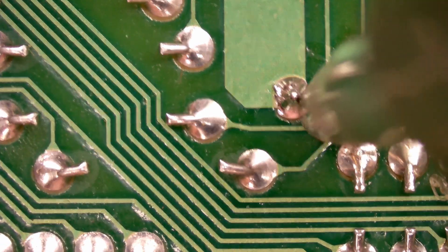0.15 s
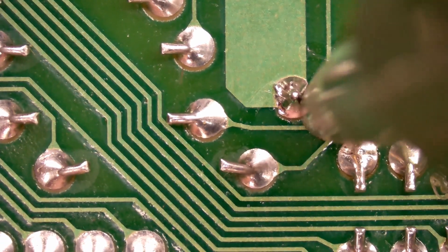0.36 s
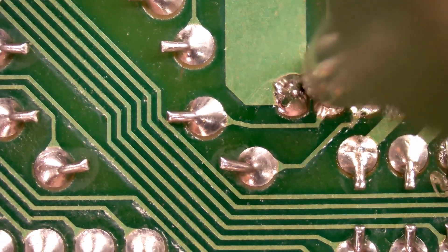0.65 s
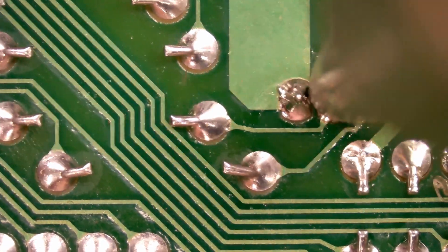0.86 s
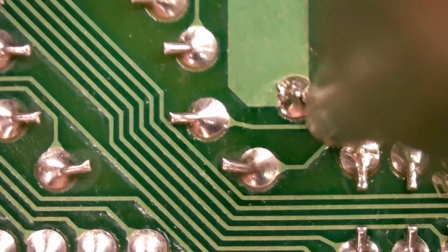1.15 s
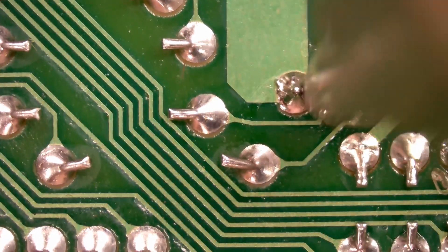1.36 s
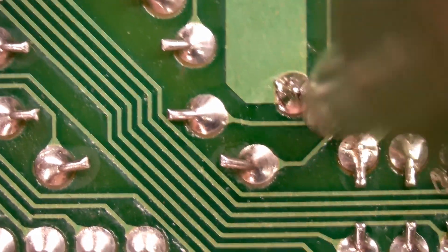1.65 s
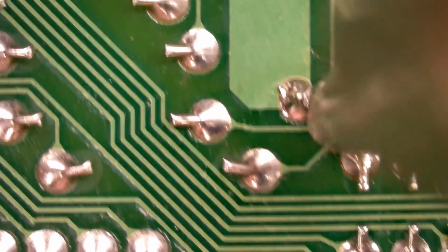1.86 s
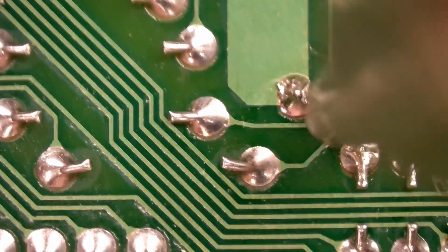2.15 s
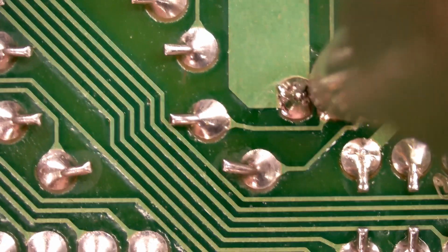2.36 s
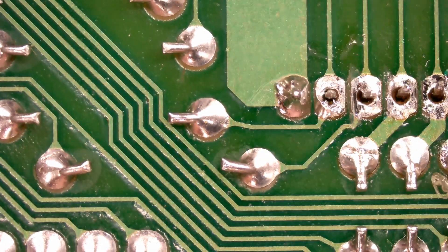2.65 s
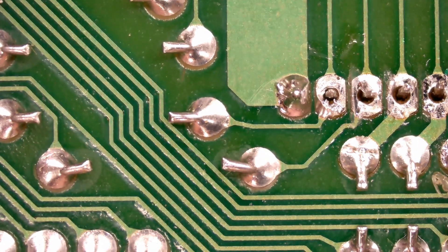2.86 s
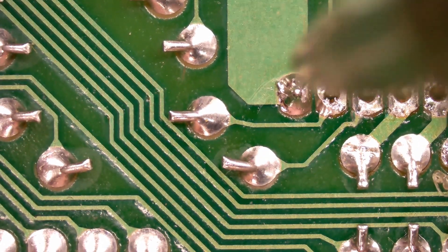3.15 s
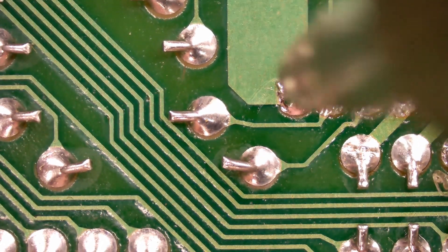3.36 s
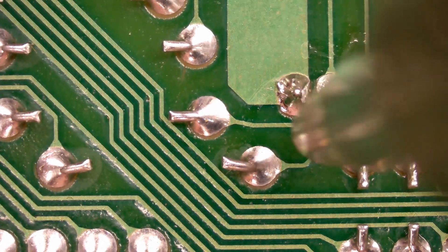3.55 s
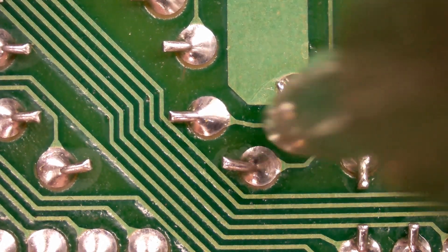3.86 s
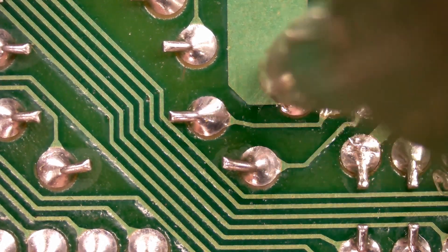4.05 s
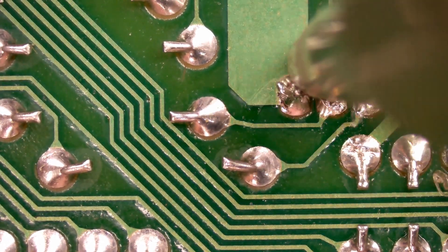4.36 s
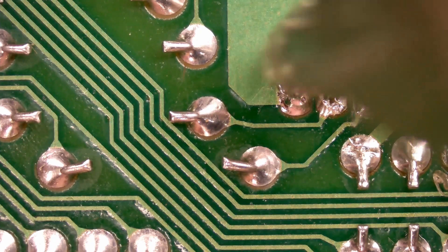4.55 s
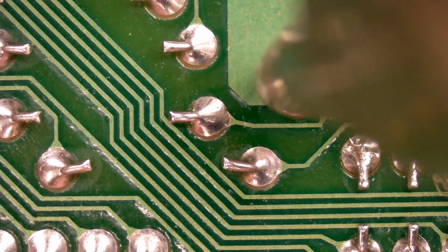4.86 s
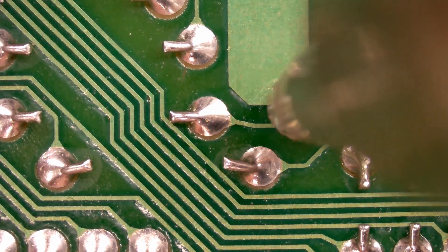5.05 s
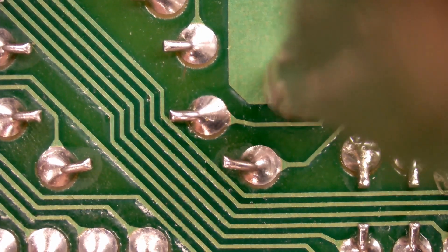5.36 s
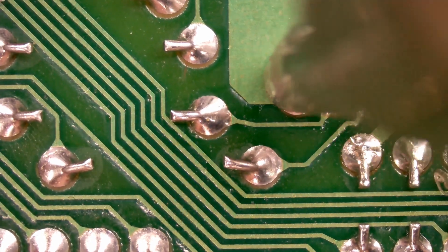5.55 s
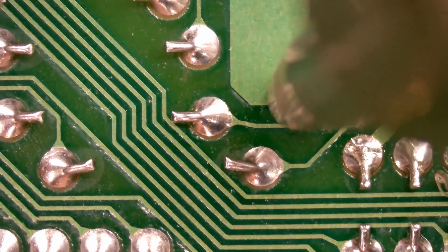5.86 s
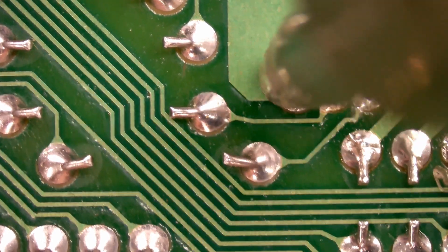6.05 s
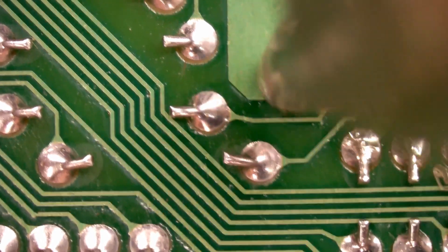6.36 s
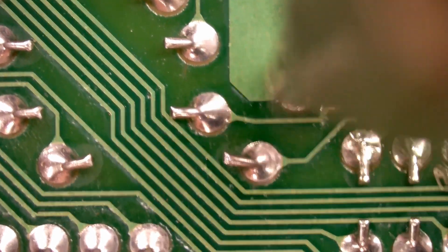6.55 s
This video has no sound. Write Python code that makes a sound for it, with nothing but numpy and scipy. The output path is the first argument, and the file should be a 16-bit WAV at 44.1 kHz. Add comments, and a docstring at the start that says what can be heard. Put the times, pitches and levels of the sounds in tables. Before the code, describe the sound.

Buzzing pump hum and thin suction hiss from a desoldering gun, with small metallic scrapes and a sharp spit of solder.

```python
"""Desoldering gun on a circuit board.

A diaphragm pump hums on the bench at about 50 strokes a second; air hisses into the hot nozzle.
Twice a solder joint seals it: the hiss dies, vacuum builds, the pump knocks and speeds up.
The seal breaks with a spit or a rush of air. The nozzle scrapes as it is rocked around the pins."""
import sys
import numpy as np
from scipy import signal
from scipy.fft import rfft, irfft, next_fast_len
from scipy.io import wavfile

SR = 44100
rng = np.random.default_rng(int(sys.argv[2]) if len(sys.argv) > 2 else 0)


def to_wav(s):
    """Save 16-bit WAV."""
    ch = np.atleast_2d(s).T  # columns
    pcm = np.round(np.clip(ch, -1, 1) * 32767)  # PCM
    wavfile.write(sys.argv[1], SR, pcm.astype(np.int16))


N = 295138

# Noise spectra: freq_hz, relative_db
ROOM_SPECTRUM = [(25, -15), (45, 6), (80, 5.5), (130, 8.5), (230, -0.5), (420, 5.5), (700, 1.5),
                 (1200, -6.5), (2200, -5), (5000, -18.5), (15800, -16)]
EXHAUST_SPECTRUM = [(700, 1), (1100, 5.5), (1700, 0.5), (2200, 1.5), (2600, -3), (3400, -0.5), (4700, -4.5),
                    (6100, -1.5), (7000, 1.5), (7800, 2), (8600, 3), (9500, -16.5), (11000, -17),
                    (15800, -16)]
HISS_SPECTRUM = [(9000, -38), (11500, -25), (12500, -16), (13300, -5), (14000, -4.5), (15000, -3),
                 (15800, 1)]
RUSH_SPECTRUM = [(1500, -14), (3000, -3.5), (4700, -5.5), (6200, -0.5), (7500, 4.5), (8600, 3.5),
                 (9600, 4.5), (10700, -3.5), (11600, 0.5), (15800, -14)]
# Resonances: freq_hz, width_hz, relative_db
OUTLET_MODES = [(5750, 1000, -1), (7500, 61, 0), (7460, 83, -1.1)]
BOARD_MODES = [(1153, 310, 1.5), (1610, 580, -2), (1900, 650, -5)]
PIN_MODES = [(2130, 250, 0), (3140, 1180, 8.5), (3585, 1300, 2), (4330, 570, -1)]
NOZZLE_MODES = [(5050, 160, -7), (6700, 1060, -5.5), (6830, 550, 5.5), (9400, 1400, 2), (9800, 1600, 0.5),
                (13600, 1900, -8.5)]
# Solder sealing the nozzle: seal_s, open_s, closing_s, opening_s
SEAL_TIMES = [(0.75, 1.53, 0.015, 0.0041), (3.381, 4.45, 0.11, .02)]
# Motor sags under part load, races with little air left: vacuum, stroke_hz
MOTOR_CURVE = [(0, 49.62), (.3, 48.85), (.53, 49.6), (.93, 52.6)]
# Pump hum: harmonic, open_db, heavy_load_db, full_vacuum_db
HUM_HARMONICS = [(1,-75,-73,-68.5), (2,-63.5,-68,-71.5), (3,-59.5,-61.5,-66.5), (4,-73,-68.5,-72.5),
                 (5,-87,-74.5,-72), (6,-71.5,-76.5,-76), (7,-62,-58.5,-70.5), (8,-60.5,-55,-70.5),
                 (9,-58,-57.5,-65), (10,-71.5,-71,-89), (11,-60.5,-66,-72), (12,-73.5,-65,-66.5),
                 (13,-67,-70,-64), (14,-78,-75.5,-73), (15,-83.5,-68,-108), (16,-73.5,-80,-71),
                 (17,-73.5,-66.5,-67.5), (18,-67.5,-81,-77), (19,-82,-64.5,-66), (20,-66.5,-63,-70.5),
                 (21,-67,-70,-62), (22,-74.5,-71,-94)]
# Hum dips and swells: harmonic, centre_vacuum, half_width_vacuum, gain_db
HUM_SWINGS = [(3,.4,.3,7), (7,.3,.12,-16), (7,.85,.04,-13), (8,.22,.1,4.5), (8,.4,.08,-9), (9,.14,.07,-4),
              (9,.53,.06,-10), (10,.14,.1,7), (10,.48,.08,6), (11,.42,.09,-8), (12,.23,.05,-8),
              (12,.52,.04,-12), (13,.24,.1,-11)]
# Hum phase lead at the left ear: freq_hz, lead_rad
HUM_LEFT_LEAD = [(50, -.5), (150, .1), (345, 0.75), (400, 1.25), (470, 0.97), (540, 1.46), (595, 2.5),
                 (690, -0.1), (800, 1.26), (930, 2), (1100, 2.38)]
# Casing response per harmonic: freq_hz, open_db, sealed_db
CASING_RESPONSE = [(1290,-118,-85), (1336,-76,-97), (1350,-82,-72), (1316,-76.5,-78), (1440,-79.5,-68.5),
                   (1480,-93.5,-97), (1682,-71,-70.5), (1607,-68.5,-68), (1733,-73,-82.5), (1870,-89,-67.5),
                   (1900,-114,-102), (2490,-77.5,-108), (2430,-74,-81), (2552,-90.5,-76.5),
                   (2660,-89,-85.5)]
# Nozzle on pin and pad: peak_s, swell_s, board_db, pin_db, nozzle_db
SCRAPE_EVENTS = [(0.12, 0.0076, -70, -62, -74), (0.23, 0.012, -69, -63, -67),
                 (0.447, 0.0043, -58, -56, -71), (0.62, 0.0067, -70, -60, -51),
                 (1.155, 0.005, -66, -73, -72), (1.261, 0.0026, -55, -80, -80),
                 (1.859, 0.0082, -65.5, -63.5, -67), (1.994, 0.0065, -62, -68, -52.5),
                 (2.127, 0.011, -65, -60.5, -59), (2.411, 0.0095, -64.5, -62, -66),
                 (2.982, 0.0086, -63.5, -63.5, -66), (3.309, 0.0022, -58, -56, -64),
                 (3.888, 0.0021, -46, -78, -81), (4.292, 0.0028, -45, -66, -64),
                 (4.755, 0.0041, -64, -55, -47.5), (4.872, 0.0087, -56, -62, -60),
                 (5.001, 0.0069, -58.5, -57, -55), (5.153, 0.011, -58.5, -62, -58),
                 (5.277, 0.0058, -61, -54.5, -53), (5.414, 0.0088, -58.5, -61.5, -56),
                 (5.591, 0.0093, -76, -54, -49), (5.685, 0.0092, -62, -61.5, -62),
                 (5.835, 0.0058, -60.5, -51, -46), (5.982, 0.0076, -63, -61, -62),
                 (6.126, 0.0097, -63, -52, -49), (6.258, 0.0061, -58.5, -61.5, -63),
                 (6.413, 0.009, -55.5, -52, -50.5), (6.554, 0.0094, -63, -60.5, -61)]
# Solder spitting through: start_s, level_db
SPIT_EVENTS = [(1.5326, -27), (1.5348, -31), (1.552, -43), (4.2916, -36.5)]
# Tip gap changing as the nozzle rocks: centre_s, half_width_s, gain_db
GAP_SURGES = [(0.572, 0.029, -2.5), (1.57, 0.044, 0), (2.0, 0.023, 7.5), (2.045, 0.029, 5),
              (4.484, .025, 3), (4.864, 0.011, 7.5), (4.99, 0.016, 7.5), (5.27, 0.012, 4),
              (5.606, 0.064, 5), (5.87, 0.048, 4), (6.166, 0.063, 8), (6.318, .025, 5), (6.418, 0.029, 3),
              (6.49, 0.06, 3.5), (6.626, 0.045, 5)]

MAINS_HZ, MAINS_DB = 120.5, -69
PUMP_DOWN_S, REFILL_S = .41, .1  # time constants
HEAVY_LOAD, FULL_VACUUM = .72, .92  # vacuum, 0-1
NOZZLE_LAG_S, CUTOFF_HZ = .000363, 15850


def from_db(db):
    """Decibels to gain."""
    return 10 ** (np.asarray(db) / 20)


def unit_rms(x):
    """Scale to unit power."""
    return x / np.sqrt(np.mean(x ** 2) + 1e-20)


def at_hz(points, hz):
    """Interpolate on a log-frequency axis."""
    points_hz, values = np.transpose(points)
    return np.interp(np.log(hz + 1e-9), np.log(points_hz), values)


def split_ears(difference):
    """Half up on the left, half down on the right."""
    return np.array([[.5], [-.5]]) * difference


def pan(left_db):
    """Ear gains for a level difference."""
    return from_db(split_ears(left_db))


def bump(x, centre, half_width):
    """Bell of height 1."""
    return np.exp(-((x - centre) / half_width) ** 2)


def gate(start_s, end_s, rise_s, fall_s):
    """0-1 window, linear ramps centred on its edges."""
    t = np.arange(N) / SR
    return np.clip(.5 + np.minimum((t - start_s) / rise_s, (end_s - t) / fall_s), 0, 1)


def drift(corner_hz):
    """Slow random wander, rms 1."""
    hop, settle = 40, 2000
    pole = np.exp(-2 * np.pi * corner_hz * hop / SR)
    white = rng.standard_normal(N // hop + settle + 2)
    slow = signal.lfilter([1], [1, -2 * pole, pole * pole], white)[settle:]
    return np.interp(np.arange(N) / hop, np.arange(len(slow)), unit_rms(slow))


def noise(spectrum, coherence, lag_s=0.):
    """Coloured stereo noise, rms 1; the right ear lags."""
    size = next_fast_len(N)
    hz = np.arange(size // 2 + 1) * SR / size
    mid, side = rng.standard_normal((2, size))
    white = rfft(np.sqrt(1 + coherence) * mid + np.sqrt(1 - coherence) * side * [[1], [-1]])
    white[1] *= np.exp(-2j * np.pi * hz * lag_s)
    colour = from_db(at_hz(spectrum, hz)) * (hz < CUTOFF_HZ)
    return unit_rms(irfft(white * colour, size)[:, :N])


def resonate(x, modes):
    """Parallel resonators of alternating sign; white noise keeps about its power."""
    out, power = 0, 0
    for k, (hz, width_hz, db) in enumerate(modes):
        radius = np.exp(-np.pi * width_hz / SR)
        gain = (1 - radius ** 2) / 2
        feedback = [1, -2 * radius * np.cos(2 * np.pi * hz / SR), radius ** 2]
        out += (-1) ** k * from_db(db) * signal.lfilter([gain, 0, -gain], feedback, x + 1e-18)
        power += from_db(db) ** 2 * gain
    return out / np.sqrt(power)


def bench(x, wet_db, t60_s, lag_s=0.):
    """Direct sound plus dense bench reflections; the right ear lags."""
    t = np.arange(SR // 10) / SR
    echoes = rng.standard_normal((2, len(t))) * from_db(-60 * t / t60_s) * (t > .001)
    echoes *= from_db(wet_db) / np.linalg.norm(echoes, axis=1, keepdims=True)
    direct = np.array([x, np.roll(x, round(lag_s * SR))])
    reflected = signal.oaconvolve(direct, echoes, axes=1)[:, :N]
    return (direct + reflected) / np.hypot(1, from_db(wet_db))


def workshop(floor_db=-65):
    """Dull room noise and the station's transformer hum."""
    mains = np.sqrt(2) * from_db(MAINS_DB) * np.sin(2 * np.pi * MAINS_HZ * np.arange(N) / SR)
    return from_db(floor_db) * noise(ROOM_SPECTRUM, coherence=.54) + mains


def hose_vacuum():
    """Vacuum, 0-1: builds behind a seal, collapses when it opens."""
    t = np.arange(N) / SR
    vacuum = np.zeros(N)
    for seal_s, open_s, *_ in SEAL_TIMES:
        built = 1 - np.exp(-np.clip(t - seal_s, 0, open_s - seal_s) / PUMP_DOWN_S)
        vacuum += built * np.exp(-np.maximum(t - open_s, 0) / REFILL_S)
    return vacuum


def exhaust(turns, vacuum):
    """One puff a stroke; under vacuum the puffs sharpen and the outlet sings."""
    throb_db = np.interp(vacuum, [0, 1], [2.5, 4.5])
    puffs = from_db(throb_db * np.cos(2 * np.pi * turns))
    air = noise(EXHAUST_SPECTRUM, coherence=.008) * from_db(np.interp(vacuum, [0, 1], [-64, -66]))
    singing = resonate(rng.standard_normal((2, N)), OUTLET_MODES) * vacuum * from_db(-75)
    return (air + singing) * puffs * pan(3.8)


def valves(turns, stroke_hz, vacuum, gain_db=1.5, uneven_db=2, lead_rad=1.66):
    """Flaps slap unevenly once a stroke; high harmonics slide through the casing's resonances."""
    casing_hz, open_db, sealed_db = np.transpose(CASING_RESPONSE)
    buzz = np.zeros((2, N))
    for k in range(23, 56):
        db = (1 - vacuum) * np.interp(k * stroke_hz, casing_hz, open_db)
        db += vacuum * np.interp(k * stroke_hz, casing_hz, sealed_db)
        rattle_rad = (.15 + .6 * vacuum) * drift(25)
        scatter_rad = .65 * rng.standard_normal((2, 1))
        phase = 2 * np.pi * k * turns + scatter_rad + rattle_rad + split_ears(lead_rad)
        buzz += np.sqrt(2) * from_db(db) * np.cos(phase)
    return buzz * from_db(gain_db + uneven_db * drift(18))


def pump_hum(turns, stroke_hz, vacuum, waver_db=.58, relief_db=5, relief_s=.067):
    """Diaphragm stroke harmonics; their balance follows the vacuum."""
    vacuum_per_s = np.gradient(vacuum) * SR
    relief = np.clip(-vacuum_per_s * relief_s, 0, 1)  # inrushing air unloads the diaphragm
    stroke_db = waver_db * drift(26) - relief_db * relief
    lurch_rad = np.clip(.053 * np.abs(vacuum_per_s), 0, .7)  # load changes unsettle the strokes
    scatter_rad = .89 * (1 - .61 * bump(vacuum, HEAVY_LOAD, .33))  # load tightens them to knocks
    hum = np.zeros((2, N))
    for k, *levels_db in HUM_HARMONICS:
        db = np.interp(vacuum, [0, HEAVY_LOAD, FULL_VACUUM], levels_db)
        db += sum(gain_db * bump(vacuum, centre, half_width)
                  for harmonic, centre, half_width, gain_db in HUM_SWINGS if harmonic == k)
        phase = 2 * np.pi * k * turns - 18 * np.log(k)  # housing smears strokes into falling chirps
        phase += scatter_rad * rng.standard_normal() + lurch_rad * drift(25)
        lead_rad = split_ears(at_hz(HUM_LEFT_LEAD, k * np.mean(stroke_hz)))
        db += stroke_db + waver_db * drift(4.6)
        hum += np.sqrt(2) * from_db(db) * np.cos(phase + lead_rad)
    return hum


def scrapes(slips_per_s=5000, grain_db=3, gain_db=4, colour_db=2, detune=.013):
    """Swells of tiny slips ring board, pin and nozzle, a little differently each time."""
    tracks = np.zeros((3, N))
    age_s = np.arange(-SR // 25, SR // 25) / SR
    for peak_s, swell_s, *levels_db in SCRAPE_EVENTS:
        slipping = rng.random(len(age_s)) < slips_per_s / SR
        slips = slipping * rng.standard_normal(len(age_s))
        slips *= from_db(grain_db * rng.uniform(-1.3, 1, len(age_s)))
        pressure = np.exp(-np.abs(age_s) / (swell_s * np.where(age_s > 0, 1.22, 1)))
        start = round((peak_s + age_s[0]) * SR)
        for track, level_db, body in zip(tracks, levels_db, (BOARD_MODES, PIN_MODES, NOZZLE_MODES)):
            modes = [(hz * (1 + detune * rng.standard_normal()), width_hz,
                      db + colour_db * rng.standard_normal()) for hz, width_hz, db in body]
            ring = unit_rms(resonate(slips * pressure, modes)) * np.sqrt(np.mean(pressure ** 2))
            track[start:start + len(age_s)] += from_db(level_db + gain_db) * ring
    board, pin, nozzle = tracks
    knocks = bench(board, wet_db=-2, t60_s=.03)
    return knocks + bench(pin + nozzle, wet_db=-3, t60_s=.03, lag_s=NOZZLE_LAG_S)


def spits(decay_s=.00035, highpass_hz=600):
    """Solder plugs snap through the nozzle with sharp cracks."""
    t = np.arange(N) / SR
    bursts = sum(from_db(db) * (t >= start_s) * np.exp(-np.clip((t - start_s) / decay_s, 0, 20))
                 for start_s, db in SPIT_EVENTS)
    highpass = signal.butter(1, highpass_hz, "high", fs=SR, output="sos")
    cracks = signal.sosfilt(highpass, bursts * rng.standard_normal(N))
    return bench(cracks, wet_db=-3, t60_s=.04)


def suction(turns, vacuum, rush_share=.47):
    """Nozzle jet: high fluttering hiss over a broad rush; a seal chokes both to a fading leak."""
    t = np.arange(N) / SR
    sealed = sum(gate(*seal) for seal in SEAL_TIMES)
    gush_db = 9 * gate(4.44, 4.755, rise_s=.02, fall_s=.06)  # air through the cleared hole
    surge_db = sum(db * bump(t, centre_s, half_s) for centre_s, half_s, db in GAP_SURGES)
    flow_db = gush_db + surge_db + .6 * drift(3.6)
    hiss_db = (1 - sealed) * (-52.8 + flow_db) + sealed * (-75 - 12 * vacuum)
    rush_db = (1 - sealed) * (-60.5 + rush_share * flow_db) + sealed * (-63.5 - 22.5 * vacuum)
    flutter_db = 1.5 * drift(59) - .9 * np.cos(2 * np.pi * turns)
    hiss = noise(HISS_SPECTRUM, coherence=.7, lag_s=NOZZLE_LAG_S) * from_db(hiss_db + flutter_db)
    rush = noise(RUSH_SPECTRUM, coherence=.12, lag_s=NOZZLE_LAG_S) * from_db(rush_db + .8 * flutter_db)
    return hiss * pan(-12.5) + rush * pan(.21)


def scene():
    """Seals set the vacuum, vacuum sets motor speed, the motor drives hum, valves and air."""
    vacuum = hose_vacuum()
    stroke_hz = np.interp(vacuum, *np.transpose(MOTOR_CURVE))
    turns = np.cumsum(stroke_hz * (1 + .001507 * drift(4.84))) / SR
    pump = pump_hum(turns, stroke_hz, vacuum) + valves(turns, stroke_hz, vacuum) + exhaust(turns, vacuum)
    return pump + suction(turns, vacuum) + scrapes() + spits() + workshop()


def record(dry):
    """Steep low-pass."""
    return signal.sosfilt(signal.ellip(12, .1, 80, CUTOFF_HZ, fs=SR, output="sos"), dry)


dry = scene()
out = record(dry)
to_wav(out)
```